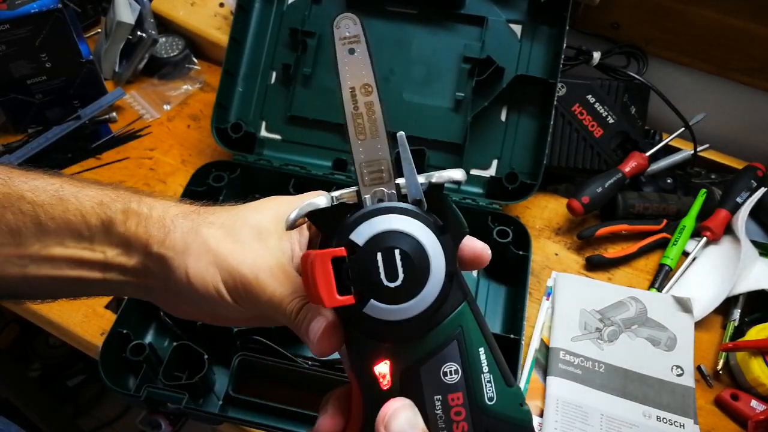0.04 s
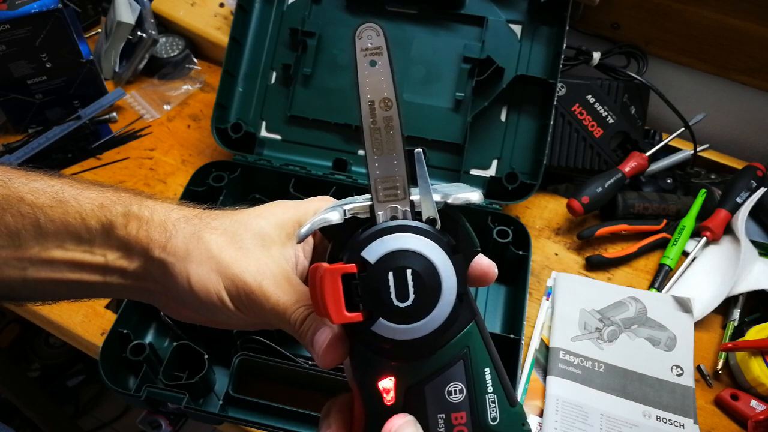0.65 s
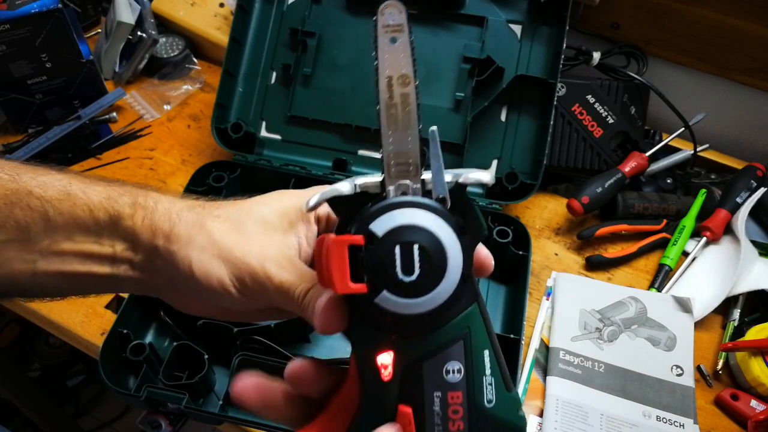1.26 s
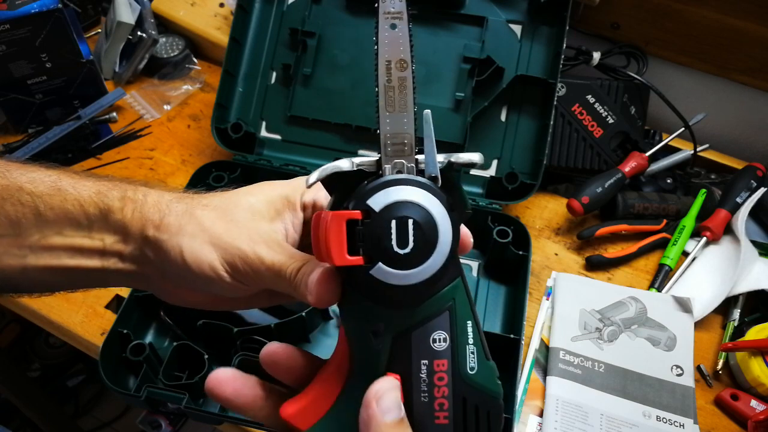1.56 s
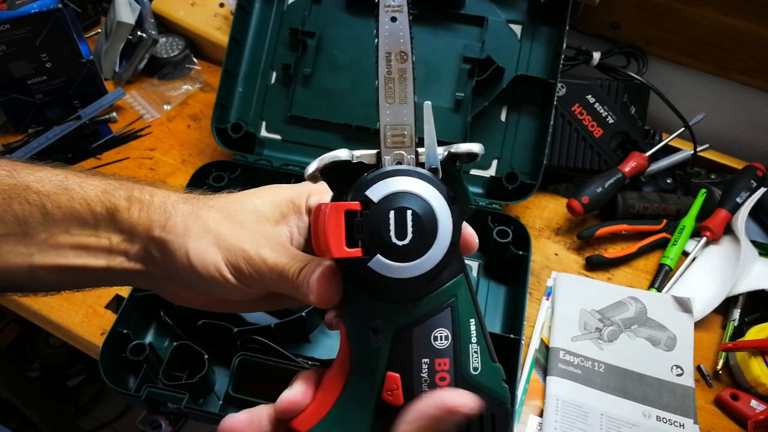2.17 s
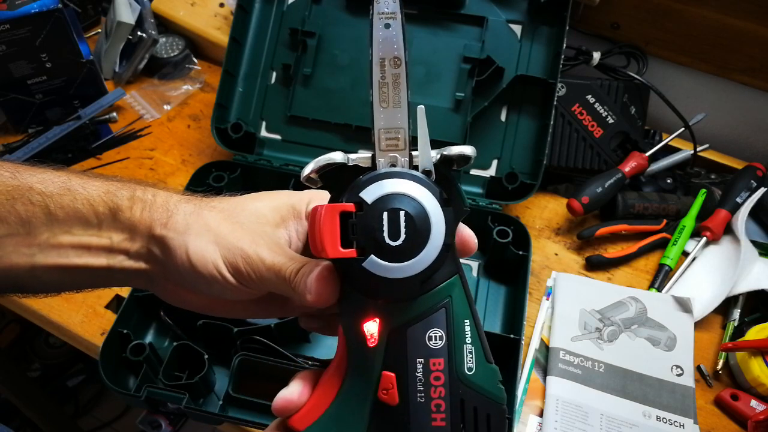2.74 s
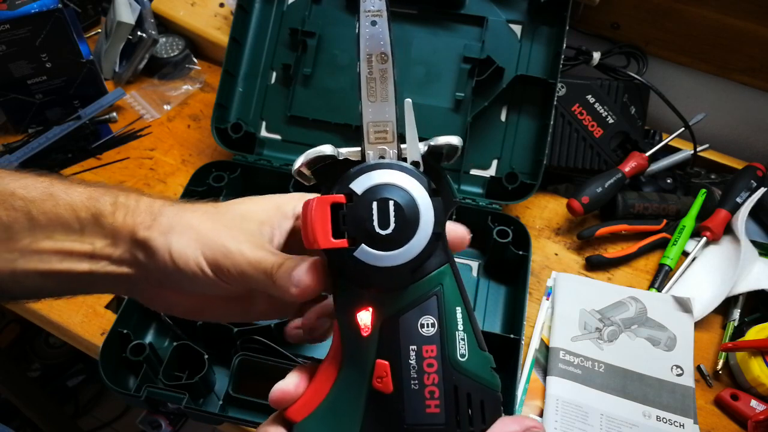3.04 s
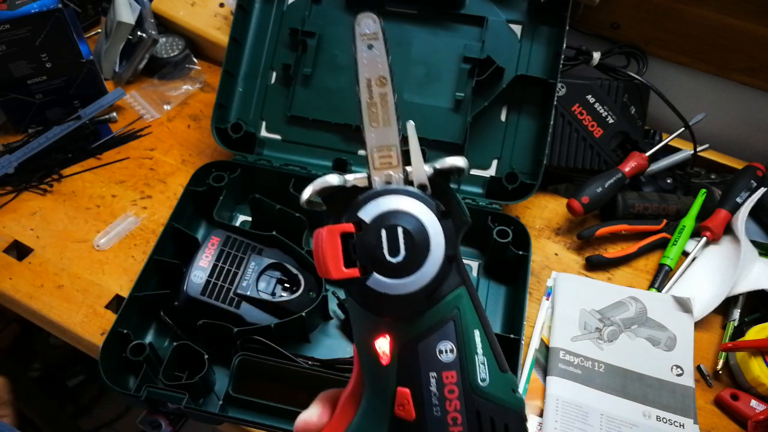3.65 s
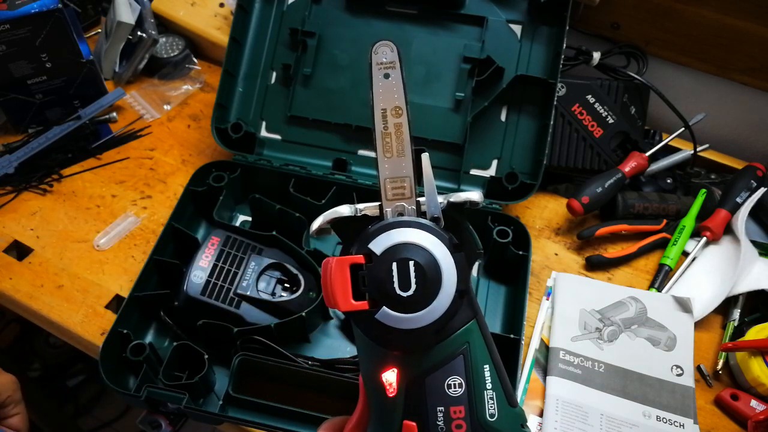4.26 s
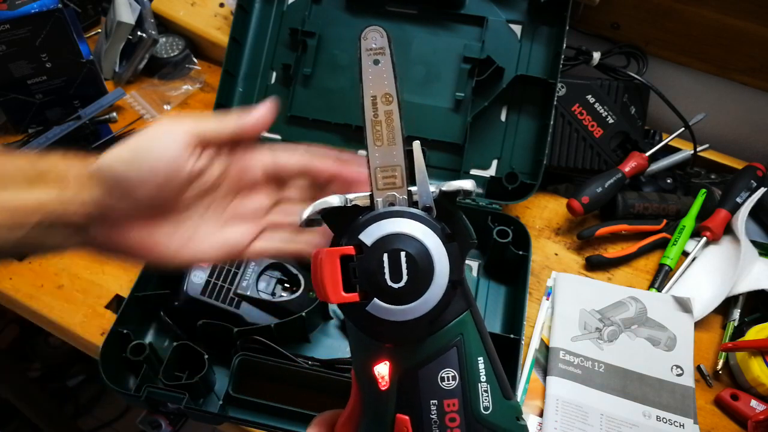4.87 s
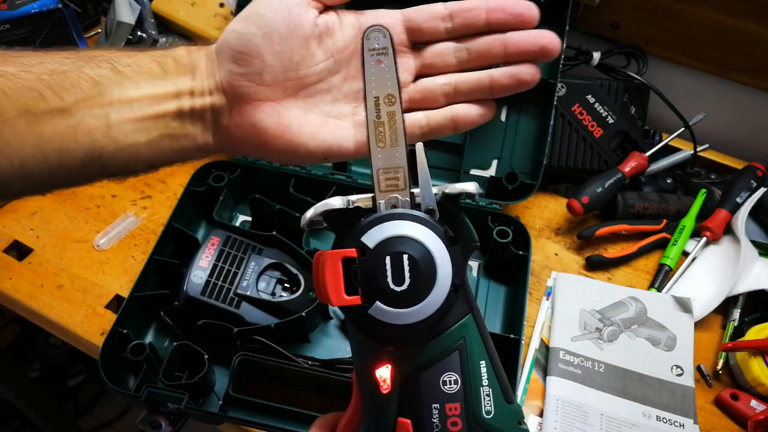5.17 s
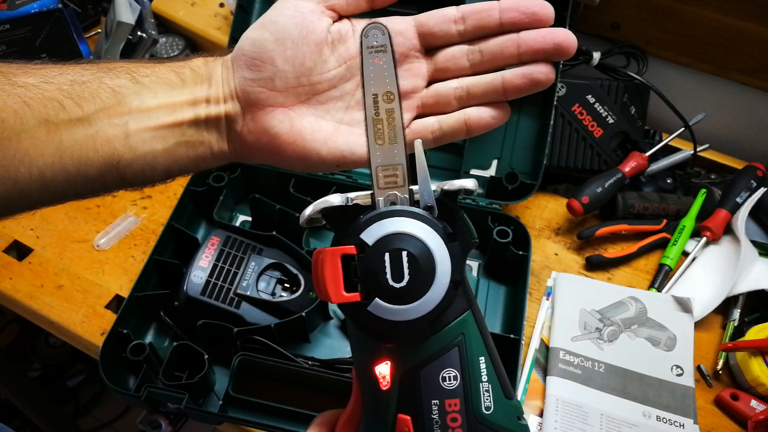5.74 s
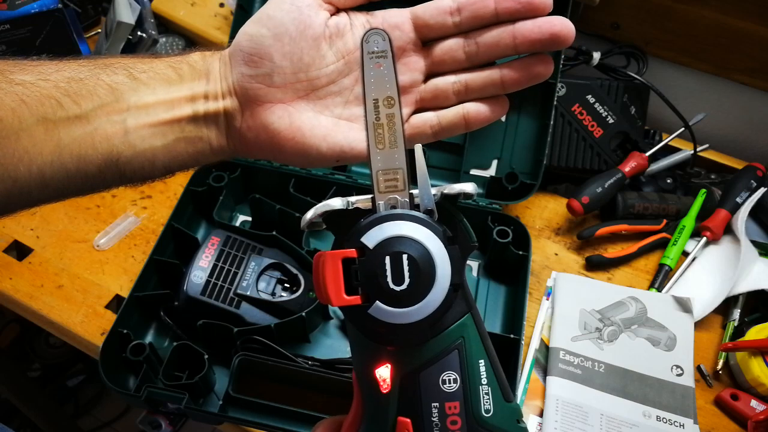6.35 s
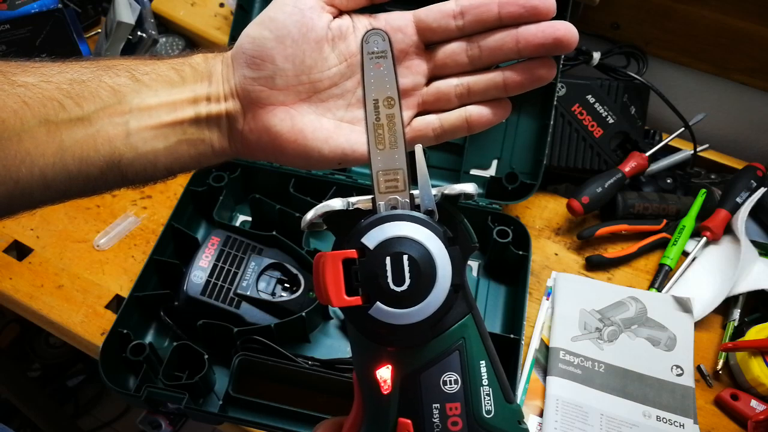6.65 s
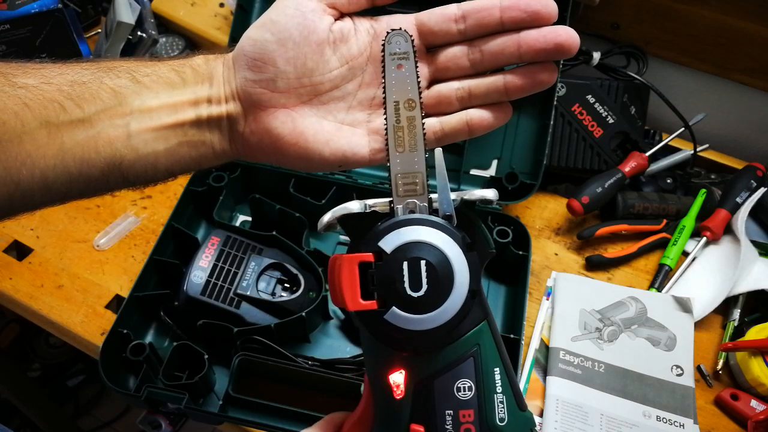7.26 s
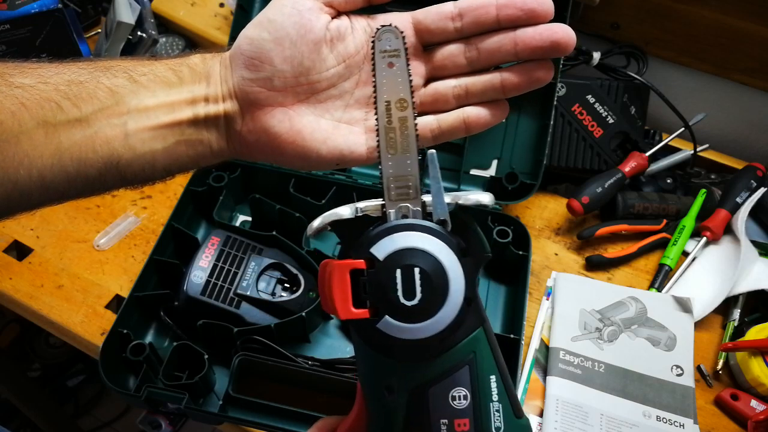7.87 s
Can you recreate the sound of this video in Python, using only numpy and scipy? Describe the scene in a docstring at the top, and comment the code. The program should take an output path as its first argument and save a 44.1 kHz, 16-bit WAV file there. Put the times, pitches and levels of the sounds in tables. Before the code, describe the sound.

Close to the microphone in a small, faintly humming workshop, a little battery chain saw spins freely with a high motor whine and metallic rattle. It stops quickly, and its plastic trigger and lock click. The chain then clatters along slowly for several seconds, gaining pace in steps before the motor rises to top speed. A sharp click comes as it brakes, and a finger faintly slides on the grip.

```python
"""Cordless chain saw, no load

A small saw, held close over a workbench, runs flat out and brakes; after a few clicks it crawls,
steps up to full speed and brakes again. Links rattle in the bar, the chain knocks once a sprocket
turn, motor and gears sing on multiples of the speed. Trigger, lock and chain slaps ring the plastic
shell; a finger slides on the grip. The small workshop hums and echoes."""
import sys
import numpy as np
from scipy import signal
from scipy.fft import rfft, irfft, next_fast_len
from scipy.io import wavfile
from scipy.ndimage import uniform_filter1d

SR = 44100
rng = np.random.default_rng(int(sys.argv[2]) if len(sys.argv) > 2 else 0)


def master(y):
    """Save y as 16-bit WAV."""
    cut = np.clip(np.atleast_2d(y).T, -1, 1)
    pcm = np.round(cut * 32767)  # scale
    wavfile.write(sys.argv[1], SR, pcm.astype(np.int16))


N = 353222
TIME = np.arange(N) / SR
OPPOSITE = np.array([[1], [-1]])  # left +, right -
CRAWL_HZ, FULL_HZ, HARD_ACCEL_HZ_PER_S = 29, 198, 500  # sprocket
SETTLE_S = 2.96  # the slack chain drags on the bar until then

# trigger moves: t/s, sprocket speed/Hz, glide/s
TRIGGER = [(-.25, 197, .555), (.3, 199.5, .5), (.92, 0, .39), (2.228, 29.01, .033), (2.75, 29.46, .3),
           (3.879, 31.17, .15), (4.247, 43.83, .16), (4.8, 44.05, .5), (5.85, 67, .13), (6.08, 200.3, .42),
           (6.955, 0, .125)]
# runs: start/s, stop/s, full-speed rattle gain/dB, bar ring gain/dB, link ring gain/dB, whistle gain/dB
RUNS = [(-.25, 1.11, -21.5, -8.5, -15, -39), (2.23, 7.029, -21.5, -17, -6, -49)]
# how the saw is held and turned: t/s, left minus right/dB, gain/dB
HOLD = [(0.5, 5, 0.65), (2.3, 2.5, 0.94), (3.0, 3.5, 1.2), (3.7, 5, 0.5), (4.1, 9, -0.5), (4.5, 11, -2),
        (4.62, 5.3, -2.5), (5.84, 6, -2), (5.92, 5.5, -1.2), (6.27, 9, -3.5), (6.42, 5, -0.5),
        (6.62, 4.4, 0.5), (6.77, 10.3, -2.5), (7.0, 11.5, -4)]
# stereo image of the saw's noise: f/Hz, left minus right/dB, coherence/0-1
STEREO_IMAGE = [(100, -3.5, 1), (400, 6.5, 0), (900, 5, 0.3), (1420, -4, 0.9), (2480, 9.5, 0.8),
                (4500, 5, 0.29), (6250, 11, 0), (8600, 5.5, 0), (15000, 12.5, 0)]
# rattle spectrum, crawling: f/Hz, relative level/dB
CRAWL_SPECTRUM = [(220, -30), (420, -16), (620, -25), (950, -6.5), (1350, -14), (1950, -1.4), (2700, -10.5),
                  (3300, -4), (4300, -5), (6100, -6.5), (6900, -13), (7500, -5), (9000, -17), (16000, -24)]
# rattle spectrum, flat out: f/Hz, relative level/dB
FULL_SPECTRUM = [(185, -21), (430, -20.5), (650, -24), (950, -12), (1400, -10.5), (1950, -4.5),
                 (2700, -6.5), (3450, 3.5), (4400, -5), (5900, -3), (6900, -10.5), (7600, -3),
                 (9500, -10.5), (16000, -13)]
# knock spectrum: f/Hz, relative level/dB
KNOCK_SPECTRUM = [(300, -22.5), (1500, -13), (3500, -7), (6500, 6.5), (8500, -0.5), (10000, 0.5),
                  (11500, -4.5), (16000, -8.5)]
# motor, gear and tooth tones: multiple of sprocket speed, crawl gain/dB, full-speed gain/dB
GEAR_TONES = [(27 / 16, -87, -56), (2, -91, -54.5), (27 / 8, -100, -65.5), (4, -91.5, -58.5), (5, -91, -50),
              (6, -96, -49.5), (10, -82.5, -41), (27 / 2, -66, -50), (20, -82.5, -49), (27, -60.5, -44.5),
              (40, -57, -55.5), (81 / 2, -63, -49.5), (189 / 4, -63, -52.5), (54, -53.5, -63.5)]
# housing resonances that lift the tones: f/Hz, width/Hz, gain/dB
HOUSING_MODES = [(890, 236, 7), (1780, 73, 10.5)]
# bar resonances that squeal: f/Hz, width/Hz, gain/dB
BAR_MODES = [(4080, 420, -32.5), (4870, 200, -33)]
# workshop air: f/Hz, relative density/dB
AIR_SPECTRUM = [(15, -36.5), (25, -8), (94, -9.5), (229, -18), (301, -14), (363, -15), (394, -13),
                (516, -19), (641, -19), (1040, -19.5), (2160, -23), (2990, -23.5), (16000, -36.5)]
# mains hum: f/Hz, level/dB
MAINS_HUM = [(99.7, -77), (299.5, -81), (399, -72.5)]
# workshop decay: f/Hz, t60/s
ROOM_T60 = [(200, 0.49), (1000, 0.55), (4000, 0.4), (8000, 0.47), (15000, 0.33)]
# trigger and lock clicks, chain slaps: t/s, gain/dB, f/Hz, t60/s
CLICKS = [(1.049, -9.5, 3500, 0.047), (1.088, -17, 3240, 0.04), (1.103, -48, 3200, .025),
          (1.351, -28, 3200, 0.015), (1.380, -47, 4000, .03), (1.408, -52, 9000, .015),
          (1.721, -33, 2270, 0.008), (2.2004, -19, 3930, 0.031), (2.2284, -15.5, 1770, 0.02),
          (3.223, -18, 6040, 0.0098), (3.4945, -21, 7400, 0.013), (6.9784, -4, 3300, 0.011),
          (7.828, -52, 2500, 0.02)]
# plastic shell resonances: f/Hz, width/Hz, gain/dB
SHELL_MODES = [(1010, 250, 4.5), (1680, 360, 1.5), (2930, 840, -3), (3650, 430, -5), (4750, 320, -2),
               (5670, 550, -4.5), (7600, 1800, 3.5)]
# finger slides: t/s, length/s, gain/dB
RUBS = [(1.355, .05, -60.5), (7.826, 0.053, -62.5)]
# slide spectrum: f/Hz, relative level/dB
RUB_SPECTRUM = [(500, -15), (3000, -5), (5500, -6), (7200, -2), (9500, -10), (16000, -11)]


def undb(db):
    """Decibels to gain."""
    return 10 ** (np.asarray(db) / 20)


def over_time(rows):
    """Table columns as curves in time."""
    at_s, *columns = np.transpose(rows)
    return [np.interp(TIME, at_s, c) for c in columns]


def over_hz(rows, hz):
    """Table columns interpolated in log frequency."""
    at_hz, *columns = np.transpose(rows)
    return [np.interp(np.log(hz + 1), np.log(at_hz), c) for c in columns]


def colour(x, spectrum, size=1024):
    """Minimum-phase filter of unit power; rolls off below the first point."""
    hz = np.fft.rfftfreq(size, 1 / SR)
    bass_cut = hz ** 3 / np.hypot(hz ** 3, spectrum[0][0] ** 3) + 1e-2
    cepstrum = irfft(np.log(undb(over_hz(spectrum, hz)[0]) * bass_cut))
    cepstrum[1:size // 2] *= 2
    cepstrum[size // 2 + 1:] = 0
    response = irfft(np.exp(rfft(cepstrum)))
    return signal.oaconvolve(x, response[None] / np.linalg.norm(response), axes=1)[:, :N]


def ring(x, hz, width_hz):
    """Resonance with steep skirts."""
    b, a = signal.iirpeak(hz, hz / (1.5 * width_hz), SR)
    return signal.lfilter(b, a, signal.lfilter(b, a, x + 1e-18))


def nearness(hz, centre_hz, width_hz):
    """1 at the centre of a resonance, 0.5 at its edges."""
    return 1 / (1 + (2 * (hz - centre_hz) / width_hz) ** 2)


def drift(rate_hz):
    """Smooth random curve, spread near 1."""
    step = int(SR / rate_hz)
    stairs = np.repeat(rng.standard_normal(N // step + 1), step)
    return uniform_filter1d(stairs, step)[:N] * np.sqrt(3 / 2)


def stereo_noise():
    """Noise with the saw's balance and coherence at each frequency."""
    size = next_fast_len(N)
    pan_db, coherence = over_hz(STEREO_IMAGE, np.fft.rfftfreq(size, 1 / SR))
    mid, side = rfft(rng.standard_normal((2, size)))
    both = np.sqrt((1 + coherence) / 2) * mid + OPPOSITE * np.sqrt((1 - coherence) / 2) * side
    return irfft(both * undb(OPPOSITE * pan_db / 2), size)[:, :N]


def blows(count, scatter_db, decay_s, jitter_s=0., alternate_db=0.):
    """Power envelope: a blow at each whole count; every other blow is softer by alternate_db."""
    at = np.flatnonzero(np.diff(np.floor(count)) > 0)
    strength, late = rng.standard_normal((len(at), 2)).T
    energy = undb(scatter_db * np.clip(strength, -2, 2) - alternate_db * (np.floor(count[at]) % 2)) ** 2
    jittered = np.clip(at + (late * jitter_s * SR).astype(int), 0, N - 1)
    train = np.bincount(jittered, energy / energy.mean(), N)
    return signal.lfilter([1], [1, -np.exp(-1 / (decay_s * SR))], train + 1e-18) / decay_s


def sprocket_speed_hz():
    """The motor glides to each new trigger setting."""
    speed_hz, last_hz = np.zeros(N), 0
    for start_s, hz, glide_s in TRIGGER:
        u = np.clip((TIME - start_s) / glide_s, 0, 1)
        speed_hz += (hz - last_hz) * u * u * (3 - 2 * u)
        last_hz = hz
    return np.maximum(speed_hz, 0)


def chain(speed_hz, turns, rattle_db, bar_db, link_db):
    """Ten links a turn strike sprocket and bar; once a turn the chain snaps tight with a knock."""
    fast = np.clip((speed_hz - 50) / 130, 0, 1)
    brisk = np.clip((speed_hz - CRAWL_HZ) / 35, 0, 1)
    off_crawl = np.clip((speed_hz - CRAWL_HZ) / 3, 0, 1)
    rate_hz = np.maximum(speed_hz, 20)
    links = blows(10 * turns, scatter_db=3.3, decay_s=.0008, jitter_s=.0003) / (10 * rate_hz)
    # once settled, the chain snaps on the other half of the turn
    snaps = np.maximum(turns - .02, 0) + .5 * (TIME > SETTLE_S)
    knocks = blows(snaps, scatter_db=1, decay_s=.0006, alternate_db=2.5) / rate_hz
    # one shake of the loose chain per motor turn
    shakes = blows(27 / 16 * turns, scatter_db=4, decay_s=.0024, jitter_s=.00043) / (27 / 16 * rate_hz)
    drive = np.sqrt(.55 * links + (.039 + .12 * fast) * shakes + .04 * knocks + .24) * undb(rattle_db)
    rattle = stereo_noise() * drive
    body = colour(rattle * np.sqrt(1 - fast), CRAWL_SPECTRUM) * undb(-1.5)
    body += colour(rattle * np.sqrt(fast), FULL_SPECTRUM) * undb(-.5)
    # the same blows ring the steel of guard, bar and links
    strikes = stereo_noise() * drive
    guard = ring(strikes, hz=3273, width_hz=98) * undb(9 + 6.7 * brisk - 4.9 * fast)
    guard += ring(strikes * fast, hz=3560, width_hz=220) * undb(7.5)
    bar = ring(strikes * undb(bar_db + 14.5), hz=4760, width_hz=580)
    link_strikes = stereo_noise() * drive * undb(link_db)
    link_ring = ring(link_strikes, hz=6033, width_hz=450) * undb(13 - 1.8 * fast)
    link_ring += ring(link_strikes, hz=6546, width_hz=190) * undb(16 - 10 * off_crawl)
    knock = colour(stereo_noise() * np.sqrt(knocks) * undb(rattle_db - 8 - 6.4 * fast), KNOCK_SPECTRUM)
    return body + guard + bar + link_ring + knock


def bar_squeal(speed_hz, multiple=25.5):
    """The bar squeals as a gear tone sweeps through its resonances."""
    squeal = 0
    for hz, width_hz, db in BAR_MODES:
        gain = undb(db + 3 * drift(70)) * nearness(multiple * speed_hz, hz, width_hz)
        squeal += gain * np.sin(2 * np.pi * hz * TIME + 1.5 * drift(90))
    return squeal


def gears(speed_hz, turns, accel, whistle_db, flutter_turns=.0025):
    """Motor, 16:27 gear pair and sprocket teeth sing on multiples of the speed and excite the bar."""
    angle = 2 * np.pi * (turns + flutter_turns * drift(45))
    effort = np.log(np.maximum(speed_hz, CRAWL_HZ) / CRAWL_HZ) / np.log(FULL_HZ / CRAWL_HZ)
    tones = 0
    for multiple, crawl_db, full_db in GEAR_TONES:
        lift_db = sum(db * nearness(multiple * speed_hz, hz, width) for hz, width, db in HOUSING_MODES)
        gain = undb(crawl_db + (full_db - crawl_db) * effort + lift_db + 2.7 * drift(35))
        tones += gain * np.sin(multiple * angle)
    flat_out = np.clip((speed_hz - 160) / 20, 0, 1)
    bar_whistle = undb(whistle_db + 3 * drift(50)) * flat_out * np.sin(40 * angle)
    squeal = bar_squeal(speed_hz) * np.clip(1 + 10 * accel, 0, 1)  # muted while braking
    squeal = squeal * OPPOSITE  # opposite polarity: stays audible after the right channel's delay
    brake_load = np.clip(-accel, 0, 1) * (speed_hz < 135) * (speed_hz > 80)
    motor_groan = undb(-56) * brake_load * np.sin(27 / 16 * angle)
    spun_up = np.clip(speed_hz / CRAWL_HZ, 0, 1) ** 6
    balance = undb([[1.2], [-1.5]])
    return np.sqrt(2) * (tones + bar_whistle + squeal + motor_groan) * spun_up * balance


def saw(start_s, stop_s, full_db, bar_db, link_db, whistle_db):
    """One run: the rattle grows with speed and dies as the brake stops the chain."""
    crawl_db, coast_db, slack_db, pull_db = -31.5, -10, 11.5, 5.5
    speed_hz = sprocket_speed_hz()
    turns = np.cumsum(speed_hz * (TIME >= start_s - .05)) / SR
    pace = np.clip((speed_hz - CRAWL_HZ) / (FULL_HZ - CRAWL_HZ), 0, 1)
    accel = np.gradient(speed_hz) * SR / HARD_ACCEL_HZ_PER_S
    coasting = np.clip(-accel, 0, 1) * (1 - pace)
    pulling = np.sqrt(np.clip(accel, 0, 1))
    slack = (TIME < SETTLE_S) * (1 - pace)
    rattle_db = crawl_db + (full_db - crawl_db) * pace ** .99 + coast_db * coasting
    rattle = chain(speed_hz, turns, rattle_db, bar_db + slack_db * slack, link_db + pull_db * pulling)
    pan_db, hold_db = over_time(HOLD)
    sway = undb(OPPOSITE * (pan_db - 6) / 2)  # the hand turns the saw from its usual place
    rattle *= sway * np.clip(speed_hz / CRAWL_HZ, 0, 1)
    running = (TIME >= start_s) & (TIME < stop_s)
    gate = uniform_filter1d(running * 1., size=300)
    return (rattle + gears(speed_hz, turns, accel, whistle_db)) * undb(hold_db) * gate


def echoes(x, wet_db, onset_s=.0033):
    """Diffuse workshop reverberation; the top treble dies first."""
    hz, t, bins = signal.stft(rng.standard_normal((2, SR * 2 // 3)), SR)
    t60_s, = over_hz(ROOM_T60, hz)
    tail = signal.istft(bins * undb(-60 * t / t60_s[:, None]), SR)[1]
    tail *= np.clip(TIME[:tail.shape[1]] / onset_s, 0, 1)
    tail /= np.linalg.norm(tail, axis=1, keepdims=True)
    return undb(wet_db) * signal.oaconvolve(x.mean(0)[None], tail, axes=1)[:, :N]


def workshop(air_db=-65):
    """Quiet air with a wavering rumble, and mains hum."""
    size = next_fast_len(N)
    hz = np.fft.rfftfreq(size, 1 / SR)
    mid, side = rfft(rng.standard_normal((2, size)))
    both = mid + OPPOSITE * side * np.clip(hz / 900, 0, .9)
    air = irfft(both * undb(over_hz(AIR_SPECTRUM, hz)[0]), size)[:, :N]
    air *= undb(air_db) / np.sqrt(np.mean(air ** 2))
    hum = sum(undb(db + .5 * drift(3.9)) * np.sin(2 * np.pi * hum_hz * TIME + .27 * drift(23))
              for hum_hz, db in MAINS_HUM)
    return air * undb(.8 * drift(4.7)) + np.sqrt(2) * hum


def clicks():
    """Each contact is a short burst that rings the shell."""
    noise, force = stereo_noise(), np.zeros((2, N))
    t = TIME[:SR // 10]
    for start_s, db, hz, t60_s in CLICKS:
        start = int(start_s * SR)
        span = slice(start, start + len(t))
        burst = noise[:, span] * undb(db - 60 * t / t60_s)
        force[:, span] += ring(burst, hz, width_hz=hz * 2 / 3)
    return sum(undb(db + 6) * signal.lfilter(*signal.iirpeak(hz, hz / width_hz, SR), force)
               for hz, width_hz, db in SHELL_MODES)


def finger(attack_s=.006, release_s=.012):
    """Skin slips unevenly over the plastic grip."""
    envelope = 0
    for start_s, length_s, db in RUBS:
        rise = np.clip((TIME - start_s) / attack_s, 0, 1)
        fall = np.exp(-np.maximum(TIME - start_s - length_s, 0) / release_s)
        envelope += undb(db) * rise * fall
    return colour(stereo_noise() * envelope * undb(2 * drift(300)), RUB_SPECTRUM)


def scene():
    """The saw in the workshop, slightly to the left."""
    right_lag_samples = 5
    tool = sum(saw(*run) for run in RUNS) + clicks() + finger()
    direct = np.array([tool[0], np.pad(tool[1], (right_lag_samples, 0))[:N]])
    return direct + echoes(tool, wet_db=-9) + workshop()


def record(dry):
    """Steep low-pass at 15.9 kHz."""
    return signal.sosfilt(signal.ellip(10, .2, 70, 15900, fs=SR, output="sos"), dry)


dry = scene()
out = record(dry)
master(out)
```